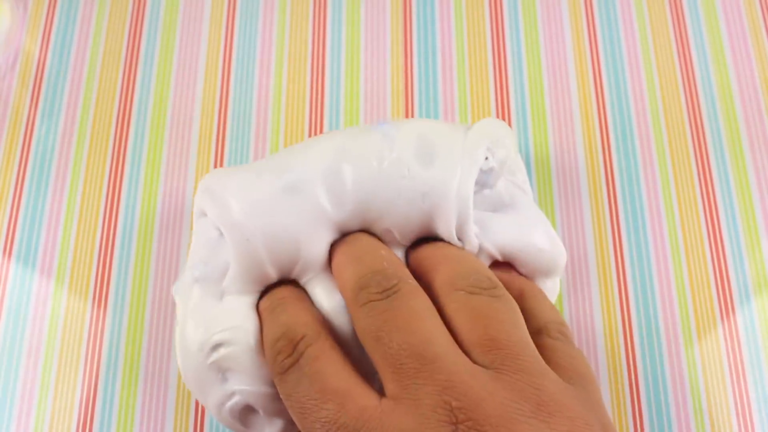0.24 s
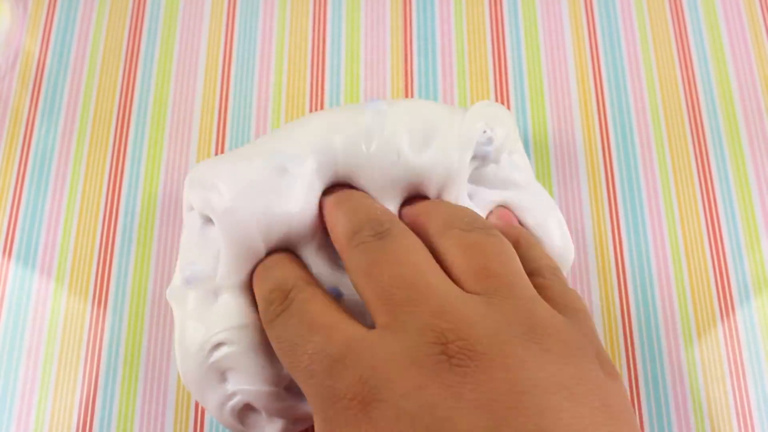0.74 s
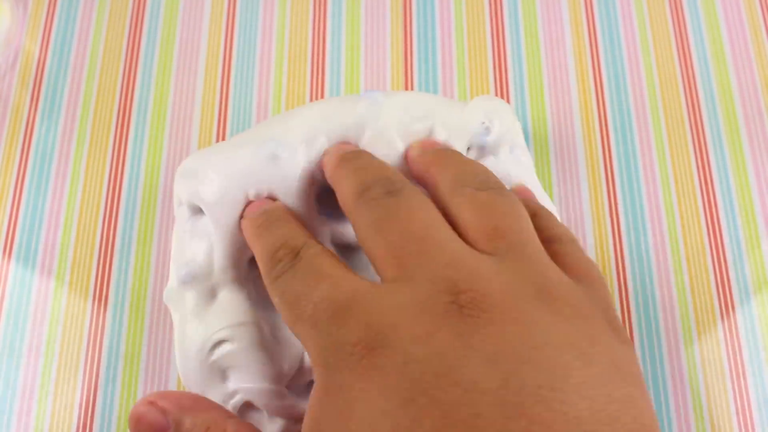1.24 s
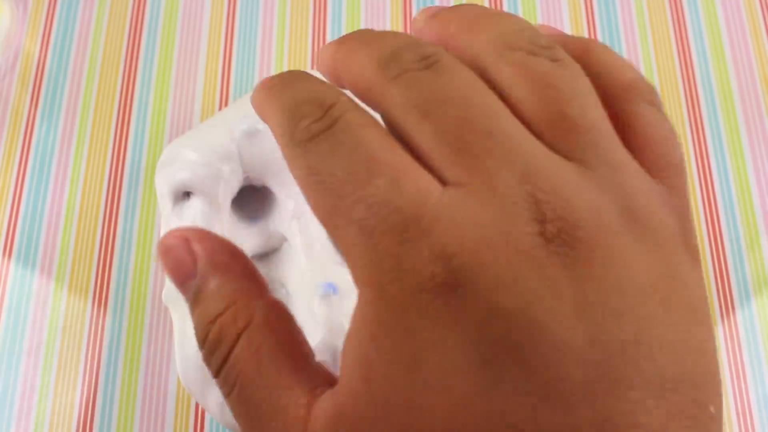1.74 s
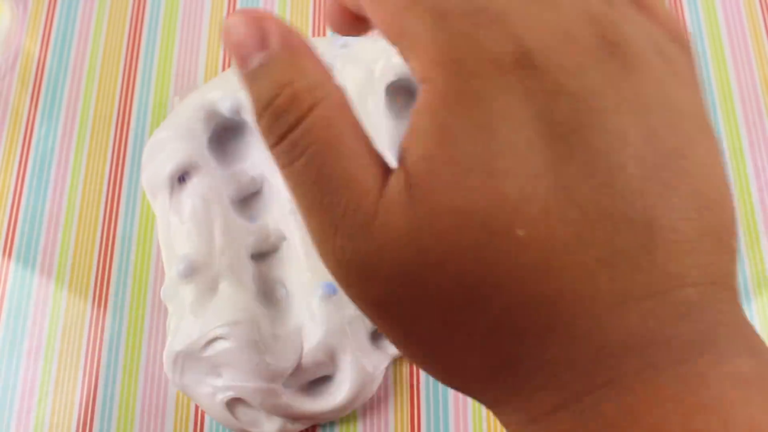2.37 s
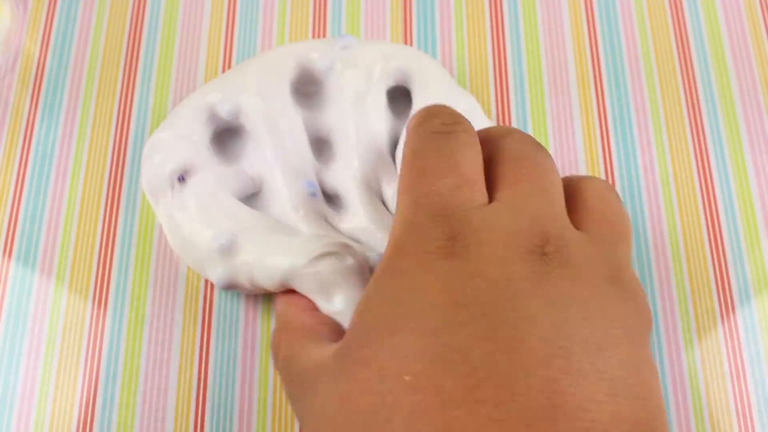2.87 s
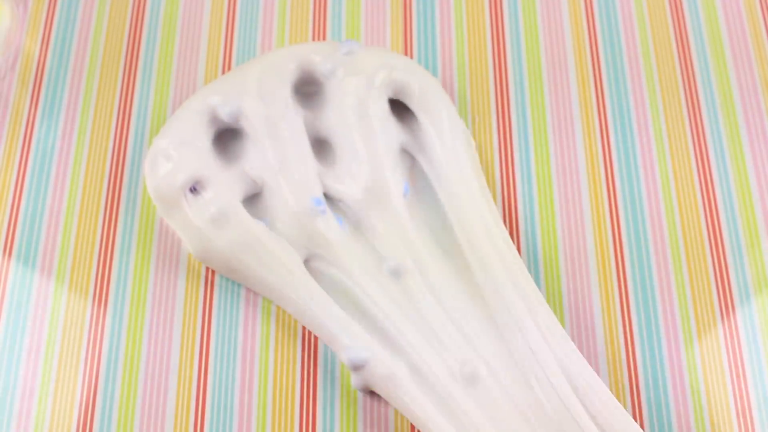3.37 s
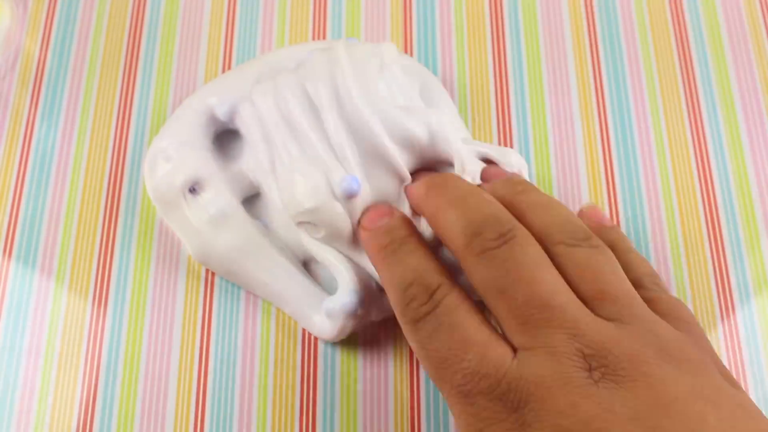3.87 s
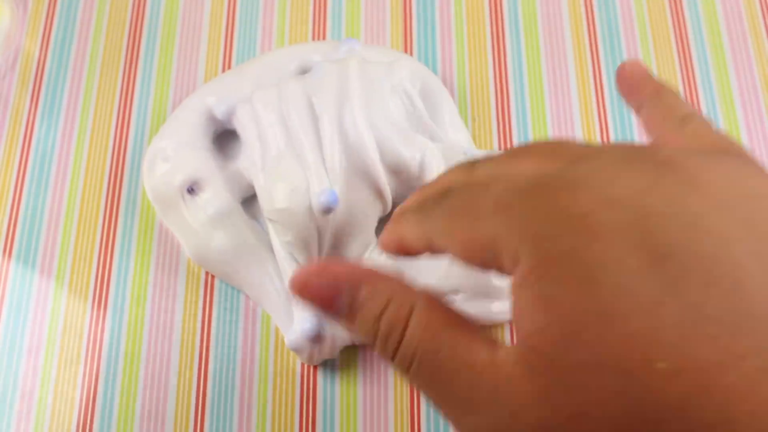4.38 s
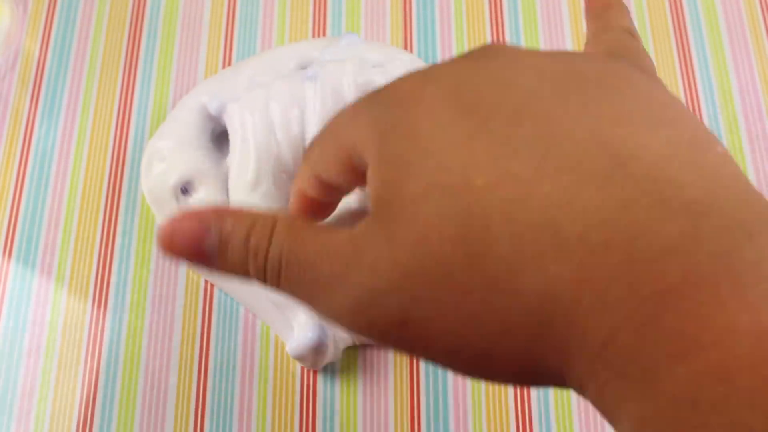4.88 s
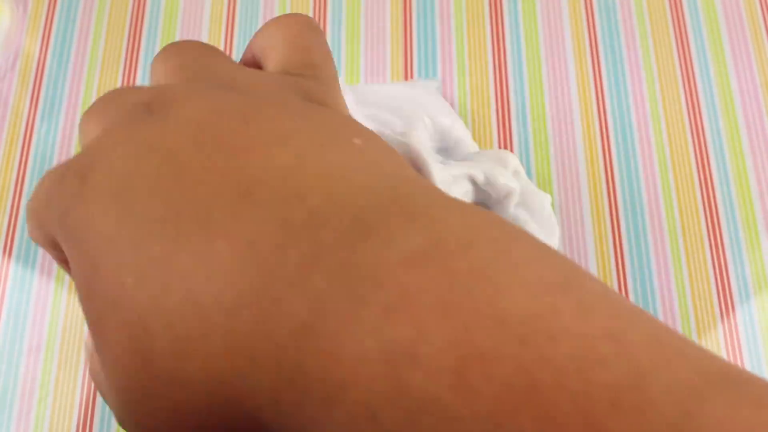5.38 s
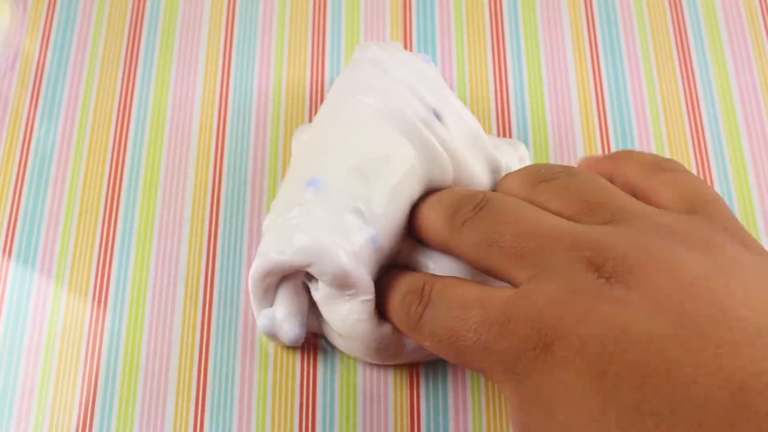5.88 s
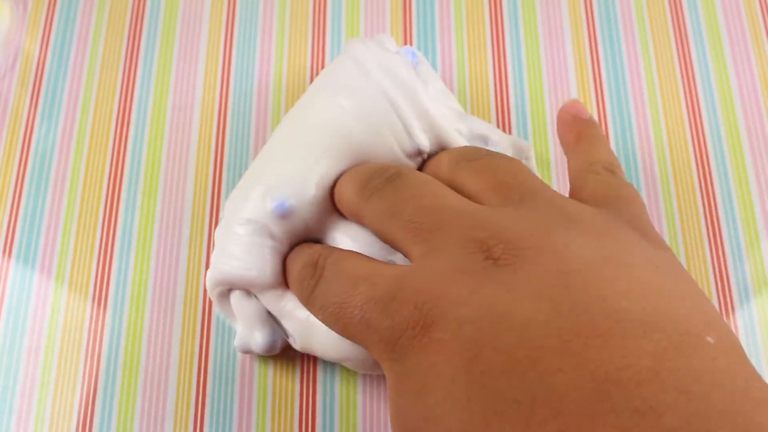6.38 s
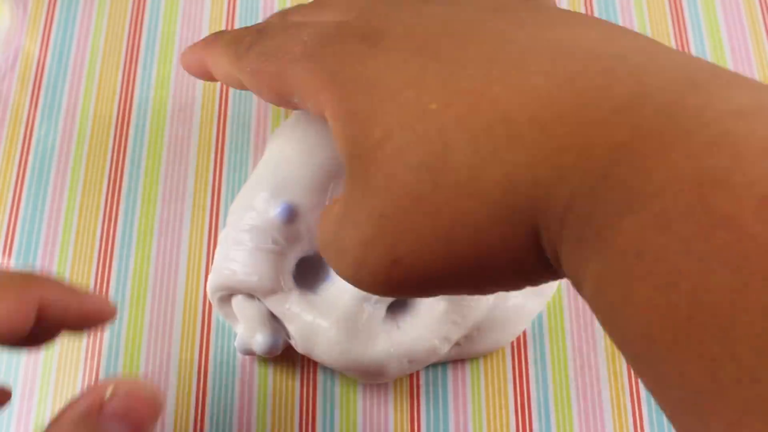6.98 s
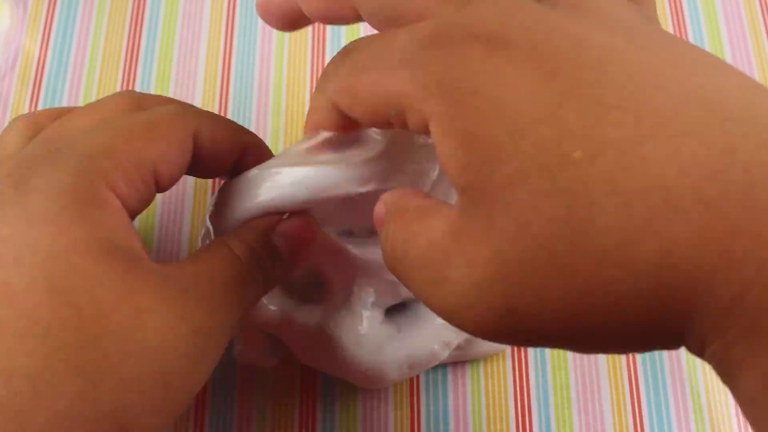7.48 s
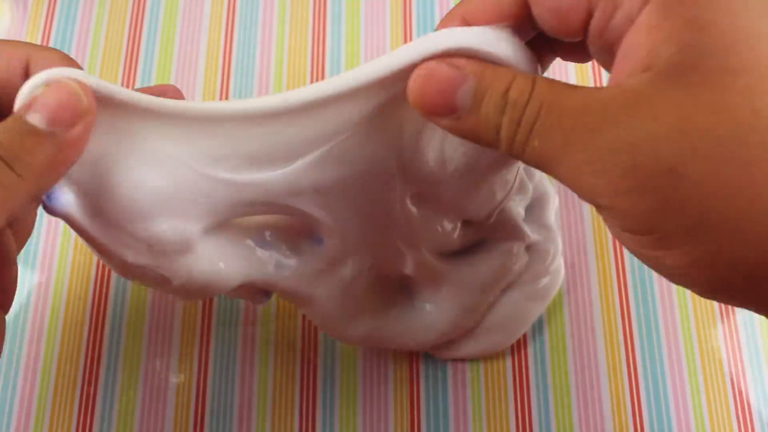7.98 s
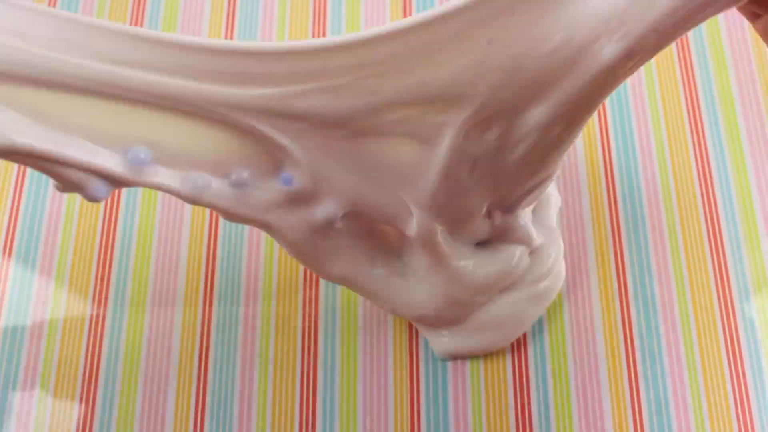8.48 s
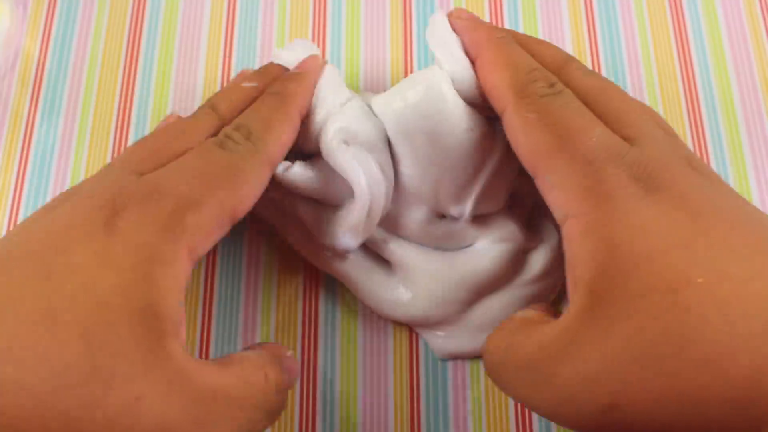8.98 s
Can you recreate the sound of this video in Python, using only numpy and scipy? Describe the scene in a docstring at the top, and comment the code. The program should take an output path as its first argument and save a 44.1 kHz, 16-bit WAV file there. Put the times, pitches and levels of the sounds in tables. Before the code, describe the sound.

Close, snappy slime popping in rapid clusters, with a stretchy crackling pause, more pops, a dull table thump and faint sticky ticks in a quiet room.

```python
"""Fingers poke, pull out of and stretch thick slime on a table in a small quiet room, close to one microphone.
From the start, bursts of suction pops: a seal cracks, a thin gap rings, the air in the finger hole swings.
From about 2.7 s, mostly ticks of bursting pockets, grains of crackle and squeaks of filtered friction noise;
pops return at 4.4 to 6.7 s, with a knock on the booming table top at 5.2 s; then small sounds and softer knocks.
Echoes, a decaying noise tail and shaped hush run throughout; a thin sine joins at 7 s. Overloads clip."""
import sys
import numpy as np
from scipy import signal
from scipy.fft import rfft, irfft
from scipy.io import wavfile

SR = 44100
rng = np.random.default_rng(int(sys.argv[2]) if len(sys.argv) > 2 else 0)


def gain_from_db(level_db):
    """Turn a decibel level (scalar or array-like) into a linear amplitude factor."""
    decades = np.asarray(level_db, float) / 20
    return 10 ** decades


def materialize(psi):
    """Save the field psi as 16-bit PCM at rate SR to the path in sys.argv[1].

    A 1-D psi becomes a single channel; in a 2-D psi each row is a channel.
    """
    bounded = np.clip(np.atleast_2d(psi).T, -1, 1)
    quanta = np.round(bounded * 32767).astype(np.int16)
    wavfile.write(sys.argv[1], SR, quanta)


N = 407043
LEAD = 6000   # samples before the start, for sounds already under way
LONG = N + LEAD


def rms_one(x):
    """Scales to unit rms."""
    return x / np.sqrt(np.mean(x ** 2) + 1e-20)


def peak_one(x):
    """Scales to unit peak."""
    return x / np.max(np.abs(x))


def at_hz(rows, hz):
    """Reads a table on a log-frequency axis."""
    rows = np.array(rows)
    return np.interp(np.log(hz), np.log(rows[:, 0]), rows[:, 1])


def band(x, low_hz, high_hz):
    """Butterworth band-pass."""
    sos = signal.butter(2, [low_hz, min(high_hz, .45 * SR)], "band", fs=SR, output="sos")
    return signal.sosfilt(sos, x)


def dying(t, t60_s):
    """Falls by 60 dB in t60_s."""
    return gain_from_db(-60 * t / t60_s)


def add(out, start_s, sound):
    """Places a sound at start_s."""
    i = round(start_s * SR) + LEAD
    out[i:i + len(sound)] += sound[:LONG - i]


def ring(clicks, hz, t60_s):
    """Two-pole resonator: a unit click sets a decaying sine of initial height 1 ringing."""
    radius = gain_from_db(-60 / (t60_s * SR))
    angle = 2 * np.pi * hz / SR
    poles = [1, -2 * radius * np.cos(angle), radius * radius]
    return signal.lfilter([0, np.sin(angle)], poles, clicks + 1e-18)


def sinking(t, hz, drop, drop_s):
    """A sine that starts sharp by the fraction drop and sinks to hz as its cavity opens."""
    return np.sin(2 * np.pi * hz * (t + drop * drop_s * (1 - np.exp(-t / drop_s))))


def tearing(noise, t, fast_s, slow_db, slow_s):
    """A noise burst that dies in two stages, its spectrum evened out so that no pitch stands out."""
    burst = rfft(noise * (dying(t, fast_s) + gain_from_db(slow_db) * dying(t, slow_s)))
    return irfft(burst / np.abs(burst), len(t)) * dying(t, 2 * slow_s)


# suction pops: (time [s], ring level [dB], ring frequency [Hz], hole level [dB], hole frequency [Hz])
POP_EVENTS = [(-.085, 9, 4095, -15, 386), (0.5224, -1, 3415, -16, 1214), (0.5454, -0.5, 7600, -13, 507.3),
              (0.5474, 3, 2516, -10, 786), (0.5685, 9.5, 4079, -1.5, 1689),
              (1.1074, -9.5, 3712, -28.5, 882), (1.1103, -15.5, 3730, -19.5, 756),
              (1.1360, 5.5, 5423, -0.5, 2256), (1.1620, -3, 2190, -14, 747), (1.1653, -2.5, 2320, -14, 578),
              (1.7417, 2.5, 3367, -8, 1733), (1.7559, 13, 3597, -16, 628.3),
              (1.7793, 3.5, 4057, -11.5, 1180), (2.4045, -12, 5960, -18, 1226),
              (2.4063, 6, 4008, -20, 1176), (2.4207, -5, 3877, -18, 1187), (2.4362, -15, 4363, -16.5, 1507),
              (4.4335, -26.5, 8000, -32, 889), (4.4669, -4, 8684, -46, 1785),
              (4.4683, -10.5, 6797, -28.5, 1725), (4.9647, 1, 7240, -18.5, 1274),
              (4.9933, -2.5, 7213, -15.5, 541.7), (4.9960, -2, 3762, -10, 1720),
              (5.0145, -12.5, 1738, -7, 1480), (5.0160, -9, 4152, -8.5, 1780), (6.0623, 4, 6220, -13, 1144),
              (6.0647, 6.5, 4180, -8.5, 1048), (6.0824, -1.5, 2257, -15.5, 894),
              (6.086, -2.5, 5996, -14, 1880), (6.6215, 6.5, 5468, -6.5, 1012),
              (6.6455, -4.5, 5119, -17, 1678), (6.6492, 6, 4992, -6, 1927),
              (6.6721, -2.5, 4980, -11.5, 549)]
# crack against ring, by ring pitch: (ring frequency [Hz], relative level [dB])
CRACK_OVER_RING = [(2200, 0), (3900, -15.5), (8000, 9)]


def pops():
    """The seal tears with a crack, the thin gap rings high, then the air in the finger hole swings lower."""
    out, t = np.zeros(LONG), np.arange(1300) / SR
    noise = rng.standard_normal((len(POP_EVENTS), 3, len(t)))
    for event, (tear, wobble, inrush) in zip(POP_EVENTS, noise):
        start_s, ring_db, ring_hz, hole_db, hole_hz = event
        crack_db = ring_db + at_hz(CRACK_OVER_RING, ring_hz)
        crack = peak_one(band(tearing(tear, t, 0.0074, -12, .025), ring_hz * .45, 15000))

        rough = 1 + 0.85 * rms_one(band(wobble, 280, 3000))   # wet walls flap
        t60_cycles = 11 + .8 * max(ring_db - crack_db, 0)   # a clean break rings longer
        gap = sinking(t, ring_hz, .22, 0.00081) * (1 - np.exp(-t / 0.000068))
        gap = gap * dying(t, t60_cycles / ring_hz) * rough

        rush = .8 * rms_one(band(inrush, hole_hz * .45, hole_hz * 2.2))   # air rushes in
        swing = sinking(t, hole_hz, 1.2, .002) + rush
        hole = peak_one(swing * (1 - np.exp(-t / 0.0017)) * dying(t, 0.021 + 15.0 / hole_hz))
        add(out, start_s, gain_from_db(crack_db) * crack + gain_from_db(ring_db) * gap + gain_from_db(hole_db) * hole)
    return out


# small air pockets snapping: (time [s], tick level [dB], pocket frequency [Hz])
SNAP_EVENTS = [(0.236, -34, 2600), (0.386, -45, 2700), (0.848, -47, 4500), (1.376, -39.5, 7000),
               (1.381, -34, 3440), (1.5508, -15.5, 3730), (1.674, -34.5, 2620), (2.039, -33.5, 4470),
               (2.683, -40, 4400), (2.773, -45.5, 3510), (2.816, -30.5, 938), (2.912, -25.5, 1410),
               (2.988, -27.5, 4030), (3.066, -27.5, 1530), (3.424, -30, 2180), (3.456, -44, 2200),
               (3.650, -36.5, 4530), (3.802, -51, 3300), (3.884, -47, 2200), (3.914, -44.5, 3600),
               (3.991, -47.5, 2000), (4.067, -45.5, 1387), (4.082, -56, 4020), (4.113, -40, 2484),
               (4.420, -21.5, 5970), (4.707, -32.5, 5520), (5.298, -31, 1443), (5.42, -43, 1970),
               (5.68, -47.5, 1994), (5.744, -43, 8680), (6.323, -28, 4430), (6.379, -36.5, 3020),
               (6.416, -34, 3003), (6.591, -46, 3000), (7.342, -44, 4010), (7.460, -38, 2040),
               (7.480, -37.5, 776), (7.505, -27.5, 1890), (7.733, -50, 1196), (7.835, -44, 994),
               (7.898, -42.5, 2020), (7.933, -40, 5260), (7.956, -45.5, 2500), (8.218, -53, 3300),
               (8.40, -47.5, 3100), (8.66, -49.5, 1505), (9.05, -38.5, 8200), (9.220, -42.5, 1060)]
SNAP_TREBLE_DB, SLAP_TREBLE_DB = -1.5, -20.5   # bright edge against the tick, for ticks at -30 dB
TREBLE_DB_PER_DB = 0.48   # fainter ticks are duller
STRAYS_PER_S, STRAY_MAX_DB = 5, -50.5   # faint pockets bursting at random
SLAP_OVER_KNOCK_DB, SLAP_HZ = 0.5, 2200   # dull wet slap on top of each knock


def snaps():
    """A pocket bursts, or slime slaps down more dully: a wide tick and a few cycles at the pocket's pitch."""
    out, t = np.zeros(LONG), np.arange(700) / SR
    chance = rng.random((int(STRAYS_PER_S * N / SR), 3))
    rows = [(*row, SNAP_TREBLE_DB) for row in SNAP_EVENTS]
    rows += [(s, db + SLAP_OVER_KNOCK_DB, SLAP_HZ, SLAP_TREBLE_DB) for s, db in KNOCK_EVENTS]
    rows += [(when * N / SR, STRAY_MAX_DB - 9 * fainter, 1500 * 2 ** (2 * pitch), SNAP_TREBLE_DB)
             for when, fainter, pitch in chance]
    noise = rng.standard_normal((len(rows), len(t)))
    for (start_s, db, hz, treble_db), tear in zip(rows, noise):
        tear = tearing(tear, t, 0.0036, -11.5, 0.024)
        body = peak_one(band(tear, hz * .45, hz * 1.9))
        edge = gain_from_db(treble_db + TREBLE_DB_PER_DB * (db + 30)) * peak_one(band(tear, 4000, 16000))
        pocket = sinking(t, hz, .3, .001) * dying(t, 20. / hz)
        pocket_gain = gain_from_db(-6 - .3 * (db + 30))   # faint pockets are more pitched
        add(out, start_s, gain_from_db(db) * (body + edge + pocket_gain * pocket))
    return out


# hand and slime knocking the table top: (time [s], level [dB])
KNOCK_EVENTS = [(2.79, -47), (3.838, -46.5), (3.959, -39.5), (4.465, -24.5), (5.296, -38.5), (5.191, -20),
                (5.2005, -17), (7.217, -29), (7.2355, -24), (9.006, -43.5), (9.072, -44), (9.175, -37.5)]
# table-top modes: (frequency [Hz], level [dB], decay time T60 [s])
TABLE_MODES = [(126, -1.5, 0.085), (214, -5, 0.095), (297, -10, .09), (445, -16, 0.09)]
JOLT_DB = -23   # each pop tugs at the table top
JOLT_DB_PER_RING_DB, JOLT_DB_PER_HOLE_DB = 0.13, 0.26


def table():
    """Each soft knock or jolt strikes every mode of the table top with a strength of its own."""
    jolts = [(s, JOLT_DB + JOLT_DB_PER_RING_DB * ring_db + JOLT_DB_PER_HOLE_DB * hole_db)
             for s, ring_db, _, hole_db, _ in POP_EVENTS]
    out, (start_s, strike_db) = np.zeros(LONG), np.transpose(KNOCK_EVENTS + jolts)
    chance_db = rng.normal(0, 2, (len(start_s), len(TABLE_MODES)))
    for k, (hz, mode_db, t60_s) in enumerate(TABLE_MODES):
        clicks = np.zeros(LONG)
        clicks[np.round(start_s * SR).astype(int) + LEAD] = -gain_from_db(strike_db + mode_db + chance_db[:, k])
        out += ring(clicks, hz, t60_s)
    return band(out, 85, 1100)


# swells of fine crackle where slime peels and stretches: (start [s], length [s], level [dB])
CRACKLE_SWELLS = [(2.8, 0.38, -62.5), (3.01, 0.027, -53.5), (3.11, 0.068, -53), (3.18, 0.062, -51.5),
                  (3.42, 0.088, -62), (3.78, 0.23, -68.5), (4.684, 0.043, -62.5), (5.25, 0.22, -59.5),
                  (5.58, 0.16, -73), (6.28, 0.12, -65.5), (6.85, 0.43, -75.5), (7.24, 0.21, -68.5),
                  (7.43, 0.077, -60), (7.56, 0.098, -62.5), (7.72, 0.31, -71), (8.19, 0.086, -75),
                  (8.6, 0.08, -66), (8.95, 0.35, -68.5), (9.12, 0.36, -55.5)]
GRAINS_PER_S = 3500.   # for a -52 dB swell, before clumping; faint swells are sparser
CRACKLE_HZ = 2500   # favoured pocket pitch
PEEL_S, PEEL_DB = .022, -64.   # the skin peels faintly just before the first pop of a pull


def crackle():
    """Tiny pockets burst at random and in clumps, each ringing a few cycles near the typical size."""
    out, pitches_hz = np.zeros(LONG), np.geomspace(700, 13000, 12)
    starts_s = np.array(POP_EVENTS)[:, 0]
    peels = [(s - PEEL_S, PEEL_S, PEEL_DB) for s in starts_s[1:][np.diff(starts_s) > .1]]
    octaves_off = np.abs(np.log2(pitches_hz / CRACKLE_HZ))
    weights = gain_from_db(-8. * octaves_off) * np.sqrt(pitches_hz / CRACKLE_HZ)
    for start_s, length_s, db in CRACKLE_SWELLS + peels:
        n = int(length_s * SR)
        clump, size, birth, deal = rng.random((4, LEAD * 4))[:, :n]
        sizes = gain_from_db(-3.6 * np.log(size + 1e-3)) * np.sign(clump - .5)   # few large, many small
        clump_db = 3.5 * rms_one(band(clump - .5, 15, 70))
        born = birth < GRAINS_PER_S * gain_from_db(.9 * (db + 52) + clump_db) / SR
        dealt = (deal * len(pitches_hz)).astype(int)   # each grain gets one pitch
        grains = np.zeros(n)
        for k, (hz, weight) in enumerate(zip(pitches_hz, weights)):
            grains += weight * ring(sizes * born * (dealt == k), hz, 14. / hz)
        grains = band(grains, CRACKLE_HZ / 2.5, 15000)

        jerks = gain_from_db(4 * rms_one(band(size - .5, 20, 120)))   # wet film sliding in jerks
        rustle = rms_one(band(deal - .5, CRACKLE_HZ * .5, CRACKLE_HZ * 3.) * jerks)
        add(out, start_s, gain_from_db(db) * (rms_one(grains) + 0.65 * rustle) * np.sqrt(np.hanning(n)))
    return out


# wet film squeaking under a fingertip: (start [s], length [s], level [dB], frequency [Hz])
SQUEAK_EVENTS = [(0.245, 0.17, -69, 2540), (2.277, 0.073, -73.5, 894), (3.118, 0.19, -60.5, 2530),
                 (7.572, 0.027, -56, 2380)]


def squeaks():
    """Friction noise twice through a narrow resonance, fluttering."""
    out = np.zeros(LONG)
    noise = rng.standard_normal((len(SQUEAK_EVENTS), 2, LEAD * 2))
    for (start_s, length_s, db, hz), (rub, flutter) in zip(SQUEAK_EVENTS, noise):
        n = int(length_s * SR)
        tone = band(band(rub, hz * .91, hz * 1.09), hz * .91, hz * 1.09)
        tone = tone * gain_from_db(3.5 * rms_one(band(flutter, 15, 60)))
        add(out, start_s, gain_from_db(db) * rms_one(tone[:n]) * np.sqrt(np.hanning(n)))
    return out


# colour of the room tail: (frequency [Hz], relative level [dB])
ROOM_COLOUR = [(130, 7.5), (320, 6), (550, -1), (1000, 0), (2600, -5.5), (4300, -5.5), (7000, -7.5),
               (15000, -9)]
# decay of the room tail: (frequency [Hz], decay time T60 [s])
ROOM_DECAY = [(200, 0.25), (2600, .24), (4300, 0.28), (15000, 0.29)]
# nearest wall, once and twice: (delay [s], level [dB])
WALL_ECHOES = [(0.0097, -17), (0.0191, -23)]
TAIL_DB = -14.5   # tail energy against the direct sound


def room(x):
    """Two clear wall echoes, then a dense tail dying band by band."""
    t = np.arange(LEAD * 3) / SR
    edges_hz = 70 * 2 ** np.arange(0, 8.1, .5)
    white, tail = rng.standard_normal((2, len(t))), np.zeros(len(t))
    for k, (low_hz, high_hz) in enumerate(zip(edges_hz, edges_hz[1:])):
        hz = np.sqrt(low_hz * high_hz)
        noise = band(white[k % 2], low_hz, high_hz)   # neighbouring bands use separate noises
        tail += gain_from_db(at_hz(ROOM_COLOUR, hz)) * noise * dying(t, at_hz(ROOM_DECAY, hz))
    tail = tail * (1 - np.exp(-t / .004))
    tail = gain_from_db(TAIL_DB) * tail / np.sqrt(np.sum(tail ** 2))
    for delay_s, db in WALL_ECHOES:
        tail[round(delay_s * SR)] += gain_from_db(db)
    return signal.fftconvolve(x, tail)[:LONG]


# spectrum of the room hush: (frequency [Hz], relative density [dB per Hz])
AIR_SPECTRUM = [(24, -30.5), (45, -4.5), (88, -2.5), (150, -7), (363, -14), (570, -20), (13800, -37),
                (16000, -38.5)]
# a distant motor: (nominal frequency [Hz], rms level [dB])
MOTOR_HUM = [(86, -73.5)]
# a faint thin tone that comes and goes: (start [s], length [s], peak level [dB], frequency [Hz])
THIN_TONE = (7, 3.4, -75, 378)
AIR_RMS_DB = -65   # before breathing


def hush():
    """Shaped noise that breathes a little, a thin sine, and a motor's wavering hum as narrow-band noise."""
    hz = np.maximum(np.fft.rfftfreq(LONG, 1 / SR), 1)
    shaped = irfft(rfft(rng.standard_normal(LONG)) * gain_from_db(at_hz(AIR_SPECTRUM, hz)), LONG)
    breathing = gain_from_db(1.4 * rms_one(band(rng.standard_normal(LONG), 1, 4.8)))
    out = gain_from_db(AIR_RMS_DB) * rms_one(shaped) * breathing

    start_s, length_s, db, tone_hz = THIN_TONE
    n = int(length_s * SR)
    tone = np.sin(2 * np.pi * tone_hz * np.arange(n) / SR)
    add(out, start_s, gain_from_db(db) * np.sqrt(np.hanning(n)) * tone)

    for hum_hz, db in MOTOR_HUM:
        out += gain_from_db(db) * rms_one(band(rng.standard_normal(LONG), hum_hz - 3., hum_hz + 1.0))
    return out


def scene():
    """Slime sounds in the room, with the table boom and the hush."""
    slime = band(pops() + snaps() + crackle() + squeaks(), 110, 13000)
    boom = table()
    mix = slime + room(slime + .5 * boom) + boom + hush()
    return mix[None, LEAD:]


def top_cut(x):
    """Nothing passes above the cut-off."""
    return signal.sosfilt(signal.butter(12, 16540, fs=SR, output="sos"), x)


def record(dry):
    """The microphone input clips at full scale."""
    clipped = np.clip(dry, -1, 1)
    return top_cut(clipped)


dry = scene()
out = record(dry)
materialize(out)
```